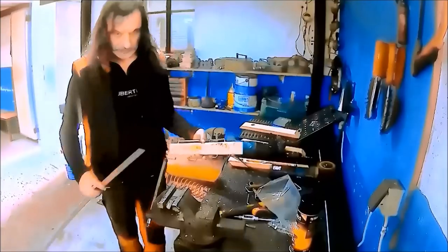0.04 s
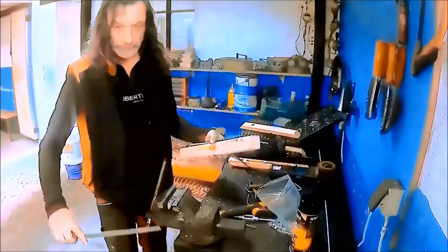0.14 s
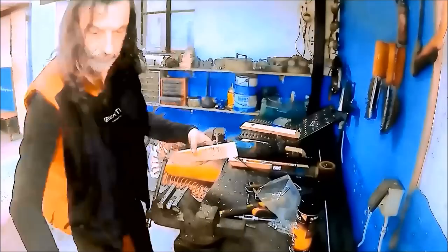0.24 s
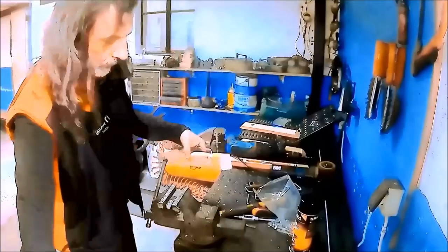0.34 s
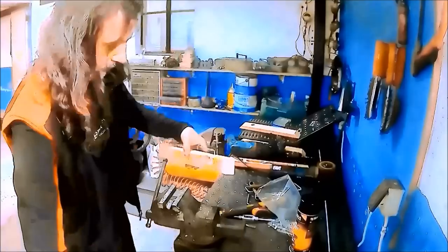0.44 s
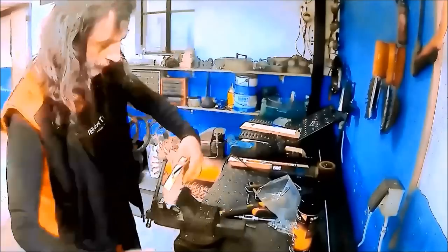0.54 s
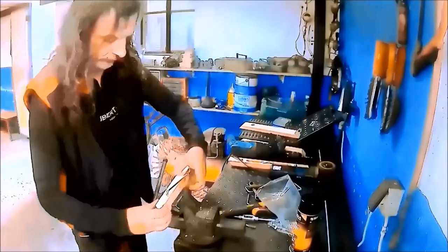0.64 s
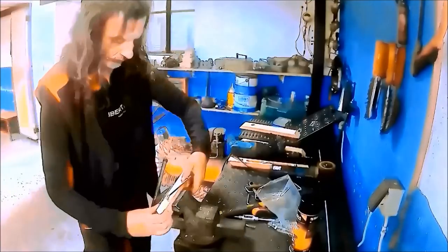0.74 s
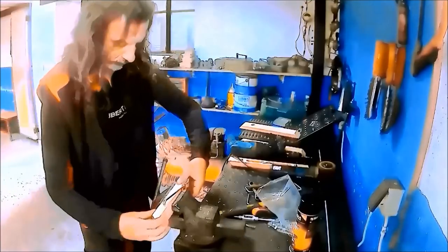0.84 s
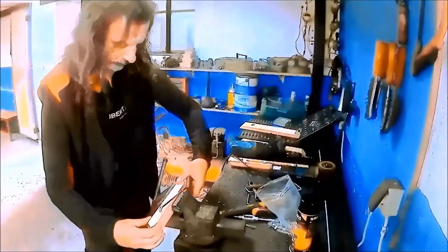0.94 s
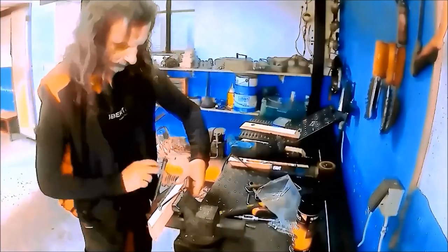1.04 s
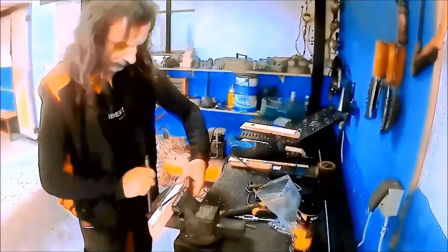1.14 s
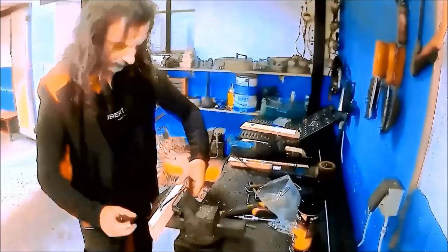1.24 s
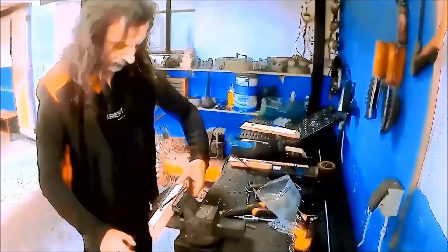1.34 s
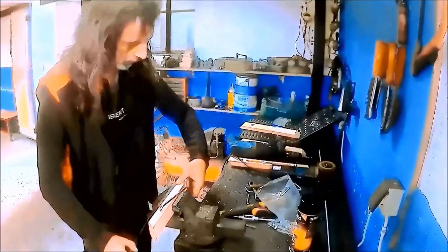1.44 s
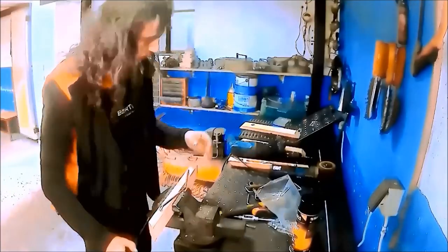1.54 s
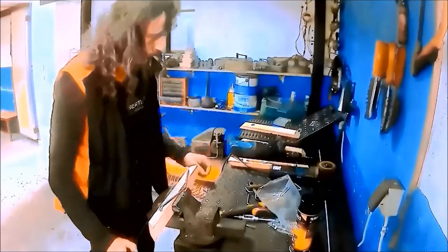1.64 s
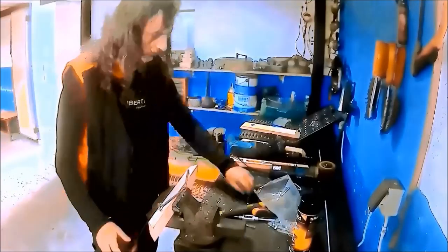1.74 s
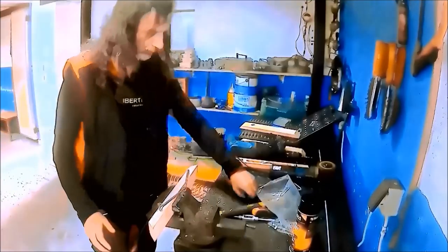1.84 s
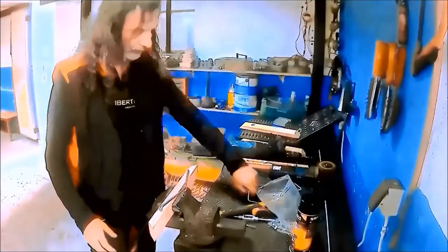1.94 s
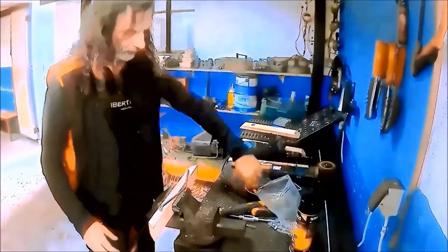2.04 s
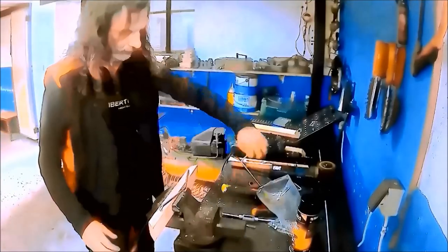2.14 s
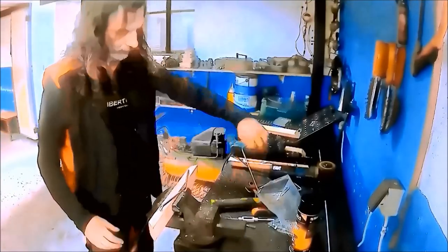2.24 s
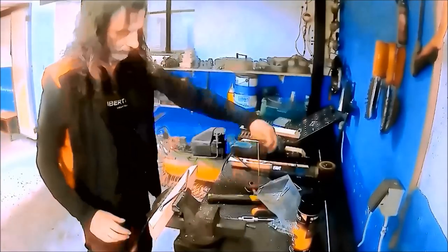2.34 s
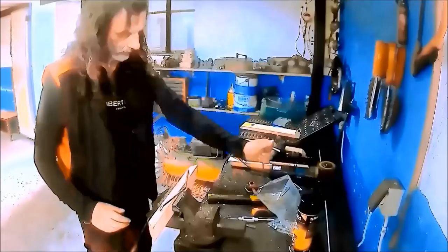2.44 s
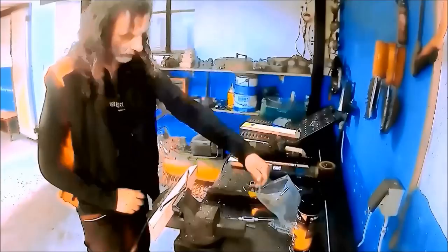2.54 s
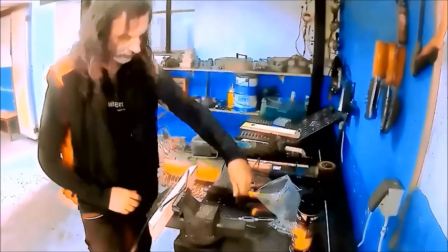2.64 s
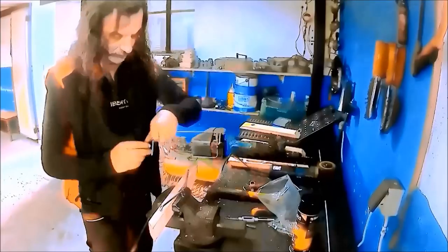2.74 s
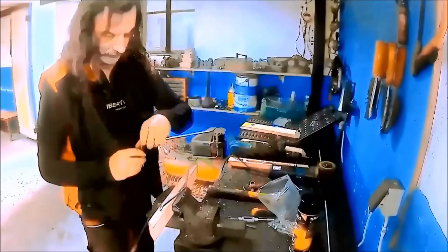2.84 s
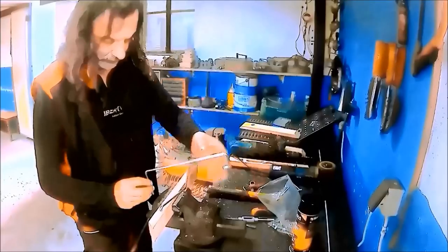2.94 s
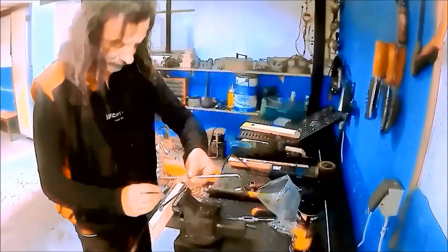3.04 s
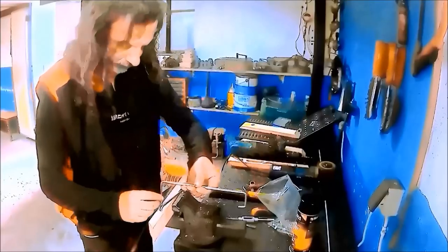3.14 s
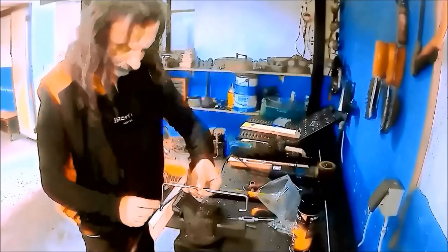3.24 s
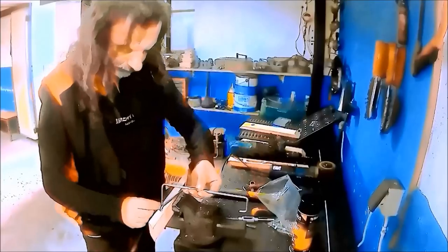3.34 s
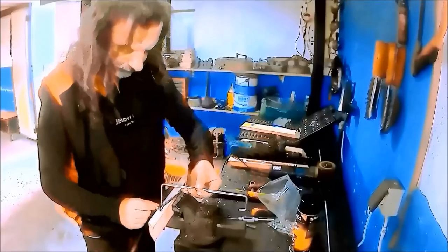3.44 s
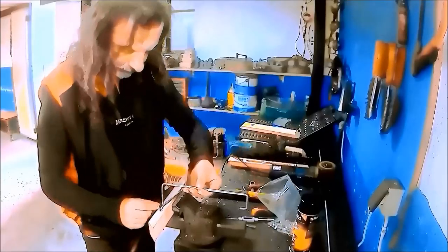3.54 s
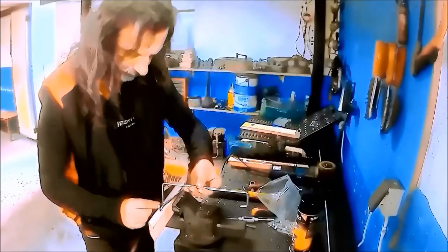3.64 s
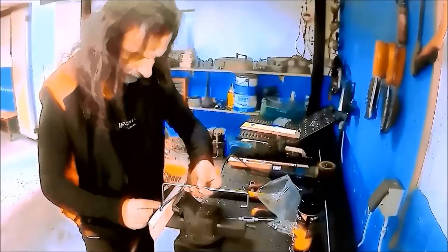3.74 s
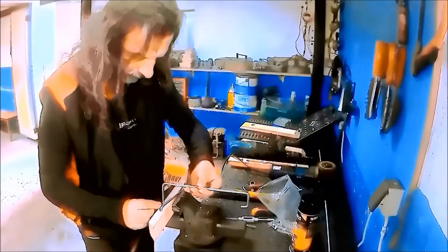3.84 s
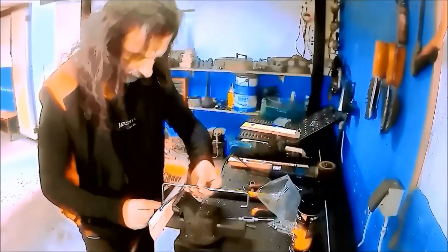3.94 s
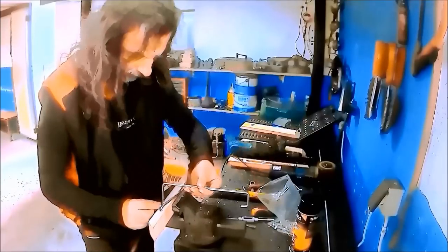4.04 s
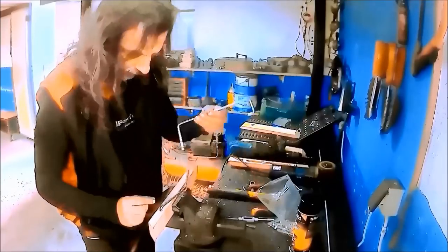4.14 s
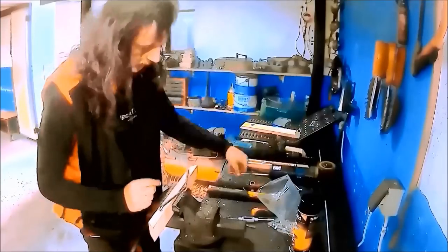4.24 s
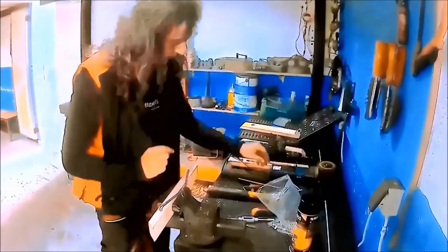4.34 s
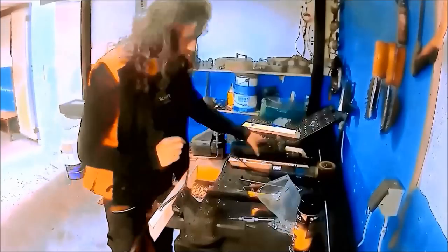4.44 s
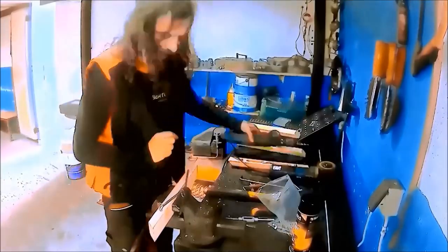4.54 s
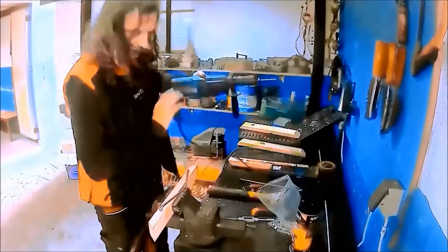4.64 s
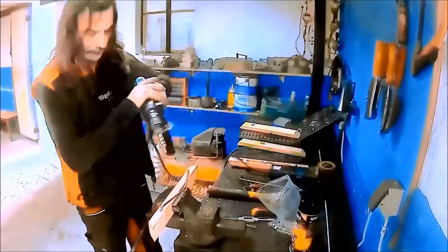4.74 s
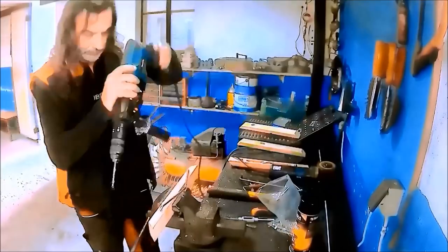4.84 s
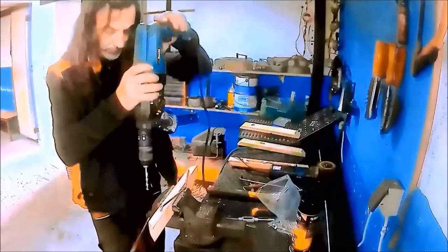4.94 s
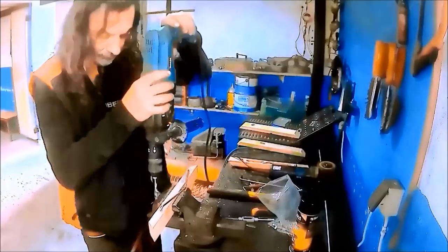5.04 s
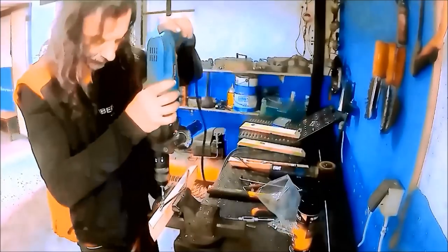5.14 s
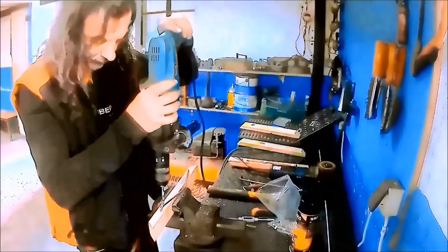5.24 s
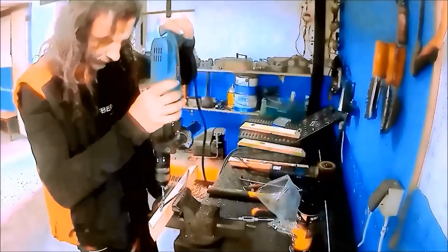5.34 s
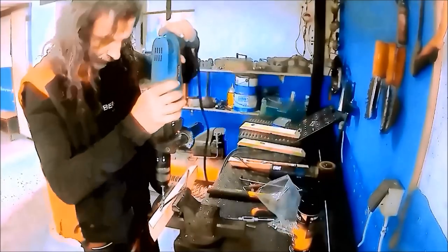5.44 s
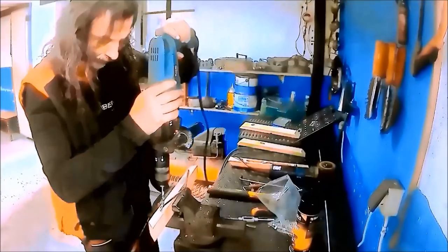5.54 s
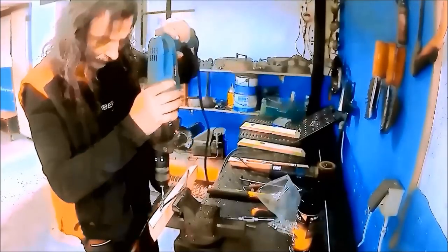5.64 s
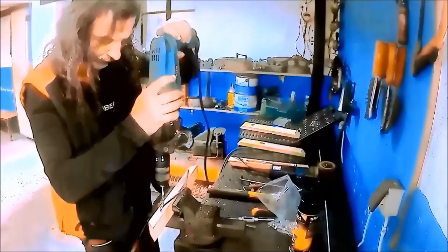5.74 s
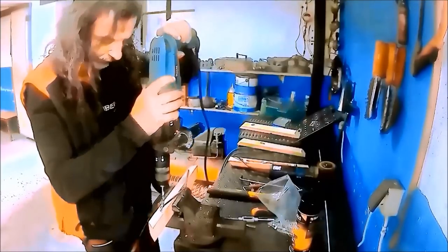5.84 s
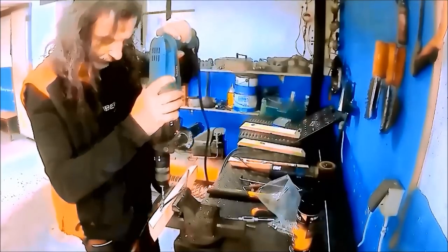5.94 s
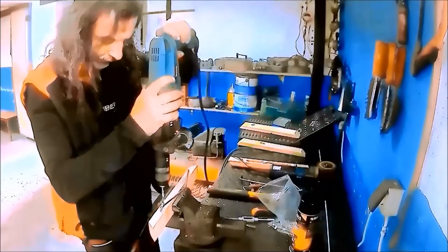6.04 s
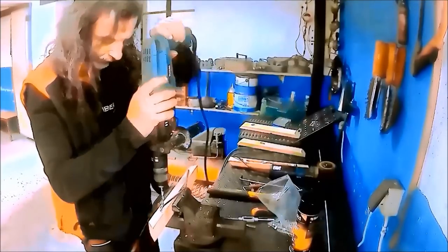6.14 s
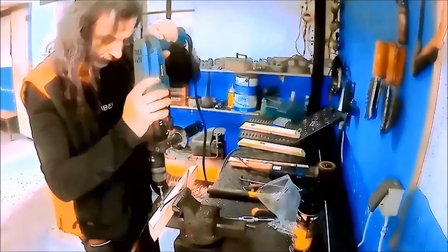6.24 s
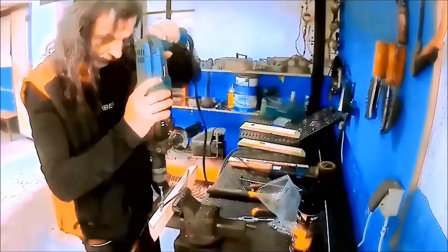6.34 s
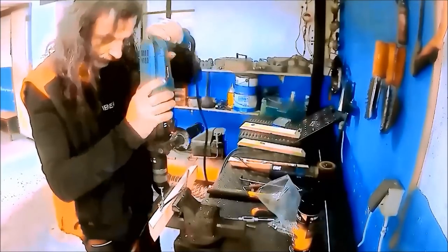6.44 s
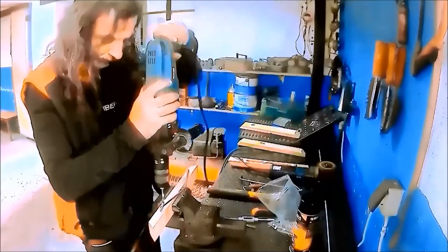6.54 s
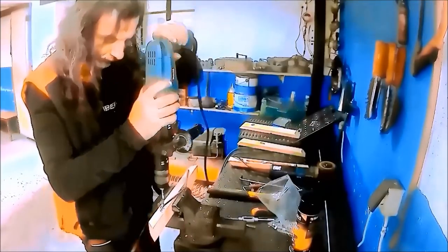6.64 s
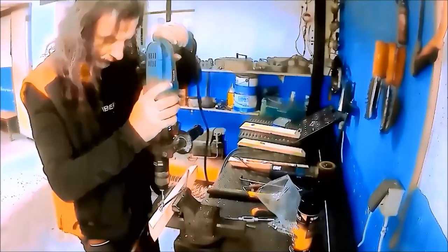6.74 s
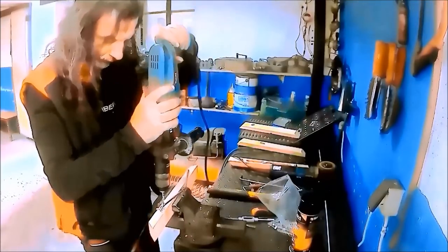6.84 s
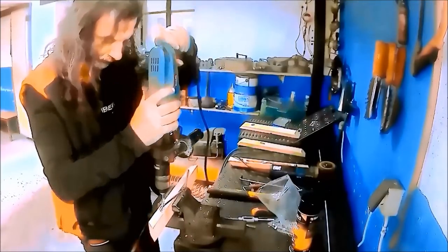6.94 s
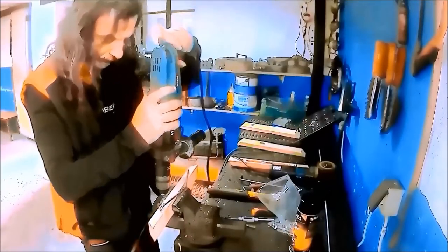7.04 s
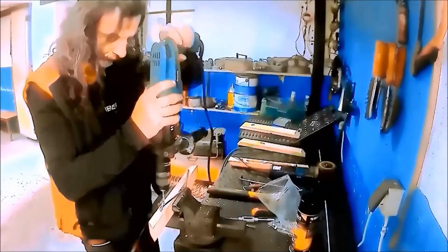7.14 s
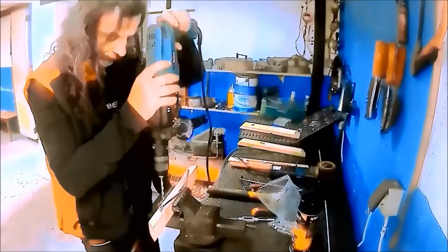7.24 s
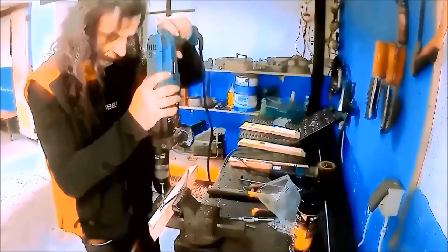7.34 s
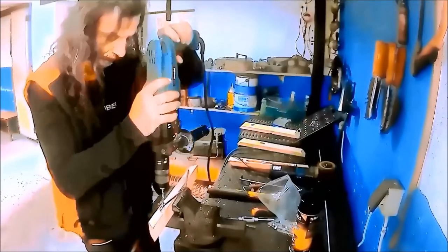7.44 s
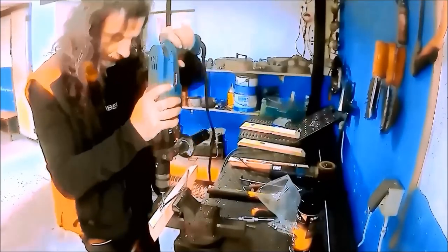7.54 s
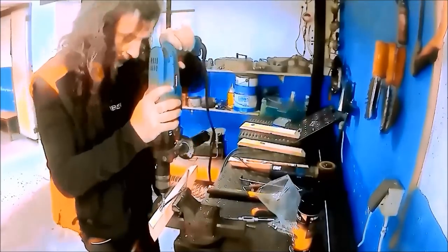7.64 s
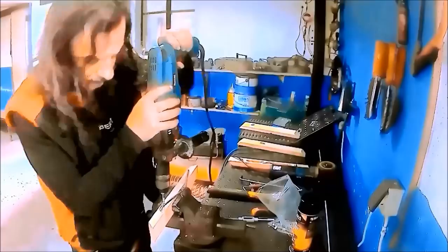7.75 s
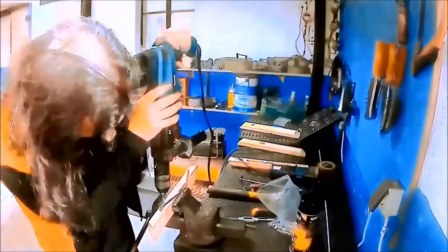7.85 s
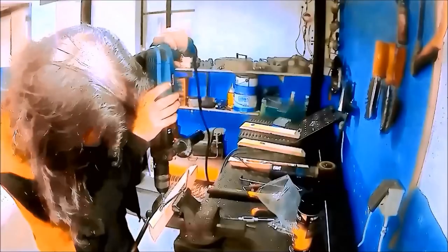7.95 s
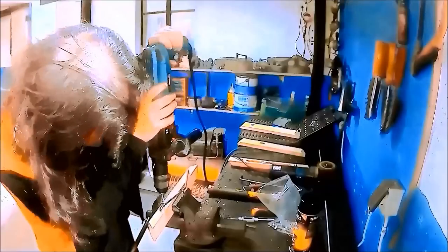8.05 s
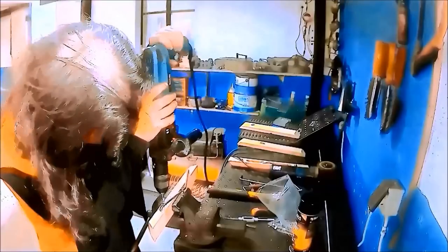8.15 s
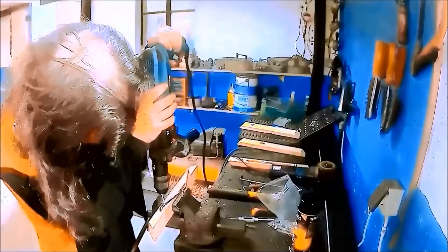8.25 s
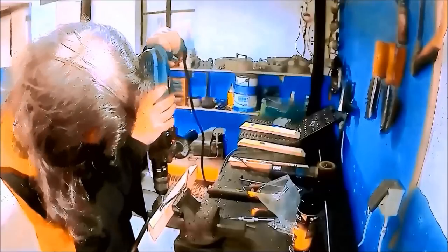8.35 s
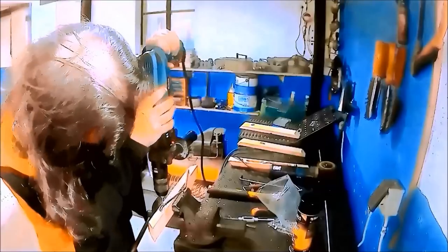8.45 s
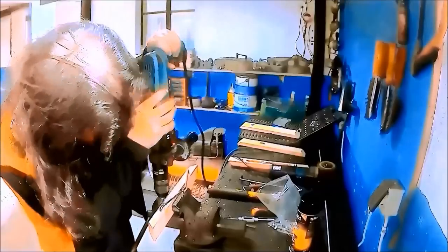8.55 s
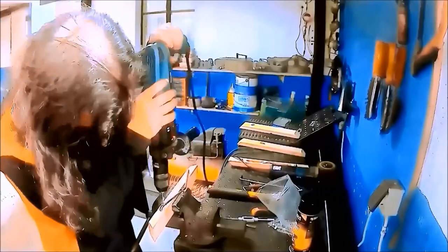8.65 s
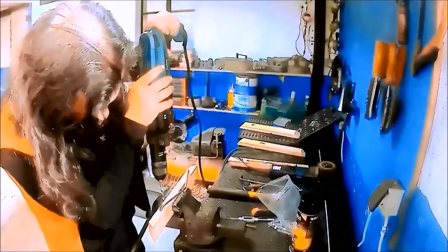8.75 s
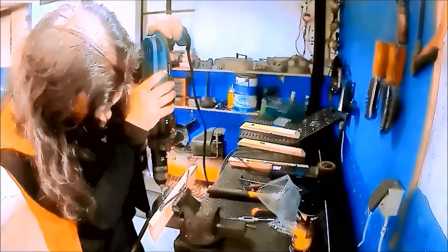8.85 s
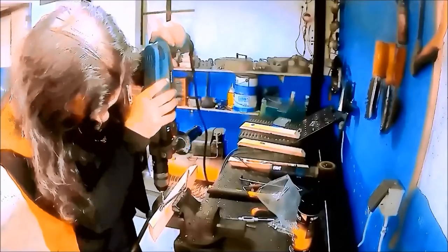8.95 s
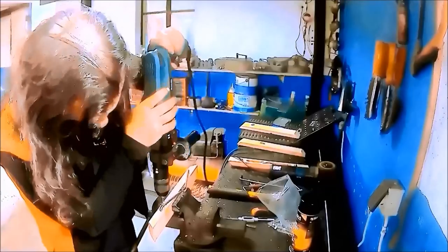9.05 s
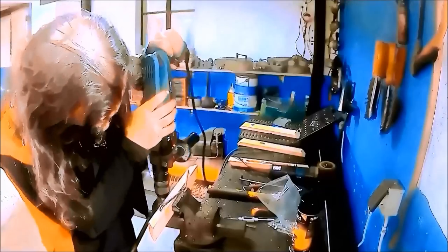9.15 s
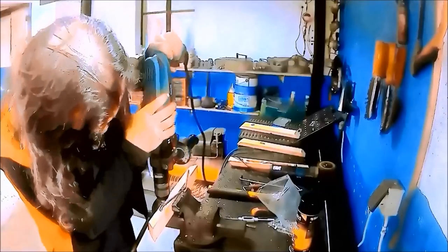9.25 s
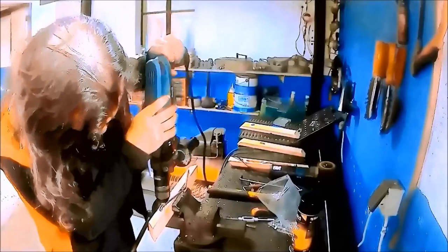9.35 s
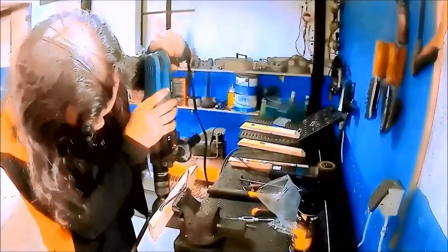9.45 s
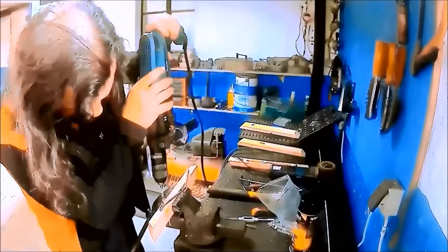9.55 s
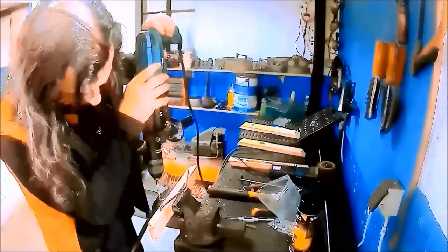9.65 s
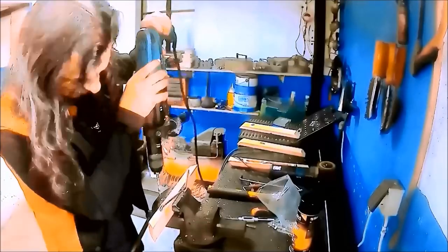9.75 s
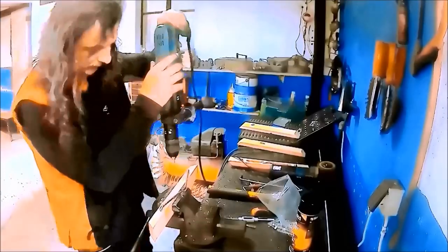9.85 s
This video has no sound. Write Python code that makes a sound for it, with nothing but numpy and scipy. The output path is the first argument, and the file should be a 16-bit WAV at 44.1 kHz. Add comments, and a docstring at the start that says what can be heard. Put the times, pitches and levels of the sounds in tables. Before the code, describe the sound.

A low, slightly wavering machine hum and soft air noise fill a small hard-walled workshop. Metal rubs briefly in a vise, then tools clatter on the bench, one clack quite loud. Later a handheld electric drill starts gently, revs up in short bursts, coasts down, then bites with a harsher, louder whine before running down. Close microphone, short room reverberation, dull above the upper treble.

```python
"""Drill bursts in a humming workshop

A machine hums steadily as wavering tones in resonant air noise. Metal slides in a bench vise (rubbed noise)
and tools land on the bench (noise cracks with steel modes). Then a handheld electric drill runs in bursts:
each squeeze pulls the rotor towards a new speed, each release lets it coast. Fan and gears whine at multiples
of its speed, brushes hiss and the bit scrapes, all louder the faster it turns.
"""
import sys
import numpy as np
from scipy import signal
from scipy.fft import rfft, irfft, next_fast_len
from scipy.io import wavfile
from scipy.ndimage import uniform_filter1d

SR = 44100
rng = np.random.default_rng(int(sys.argv[2]) if len(sys.argv) > 2 else 0)


def inscribe(sig):
    """Save sig as 16-bit PCM at rate SR to the path in sys.argv[1].

    A 1-D sig is mono; a 2-D sig holds one channel per row.
    Samples are clipped to [-1, 1] before scaling.
    """
    pcm = np.round(np.clip(np.atleast_2d(sig).T, -1, 1) * 32767)
    wavfile.write(sys.argv[1], SR, pcm.astype(np.int16))


N = 437031
TIME = np.arange(N) / SR
EDGE_HZ = 15750

# trigger pressures: start_s, target_turns_per_s, rotor_lag_s, level_db (at working speed), treble_share_db,
# whine_to_hiss_db, load (0 turning gently, 1 revving, 2 biting)
SQUEEZES = [ (6.165, 224.8, 0.12, -24, -6.5, 1, 0.2), (6.5, 187.1, 0.21, -25.5, -8, 2, 0.49),
            (6.6, 186, .2, -22, -5.5, 4.5, 0.13), (6.921, 448.8, 0.054, -20.5, -5, 2.5, 1.16),
            (7.335, 558, 0.049, -19, -7.5, -3.5, 1.3), (8.404, 245, 0.11, -22, -9.5, 3, 0.0039),
            (8.547, 346, 0.056, -20.5, -6, 2.5, 1.2), (8.809, 481.6, .076, -24, -8, -2, 1),
            (9.31, 420, .08, -15.5, -5, 3, 1.9), (9.425, 390, .3, -16.5, -6, 1, 1.95),
            (9.64, 388, 0.32, -19, -7, -6, 1.8), ]
# trigger let go: start_s, level_db (at working speed), treble_share_db, whine_to_hiss_db
RELEASES = [(7.22, -20.5, -6, 2.5), (7.413, -22, -8.5, -5), (8.954, -27.5, -8.5, -1.5),
            (9.798, -20, -7.5, -14)]
# fan blades (multiples of 5), gear teeth (multiples of 13) and neighbours:
# order (multiple of rotor speed), gentle_db, revving_db, biting_db (relative)
WHINE_ORDERS = [(5, -11, -16, 0.5), (8, -13, -12.5, -8), (10, 2, -2.5, -9), (13, -2, 5, -10),
                (15, -3.5, 1.5, -14), (18, -15, -23, -10), (20, -8, 1.5, 7), (25, -2, 1, -12),
                (26, 6.5, -6.5, 0), (30, -8, -3.5, 6), (31, -17, -4, -17), (39, -5, -13, -14),
                (40, -6, -3, -1), (45, -2, -16, -15), (50, -3, -11, -5), (54, -2, -18, -16), (60, -5, 1, 0)]
# colour of the drill's housing: freq_hz, density_db (relative)
HOUSING = [(530, -48), (900, -22.5), (1320, -21), (1760, -13.5), (2080, -10.5), (3410, -4.5), (3890, -6),
           (5060, -1.5), (6990, -3), (8070, -9.5), (8680, -4), (12400, -4), (13500, -4.5), (14900, -4),
           (15800, -27)]
# ringing of chuck and bit: freq_hz, width_hz, above_housing_db
CHUCK_MODES = [(1670, 160, 3.5), (2385, 100, 5), (3460, 44, 9), (4705, 46, 7), (6220, 500, 3),
               (7140, 500, 1.5), (9900, 110, 7), (11740, 300, 2)]
# colour of the shaking bench: freq_hz, density_db (relative)
RUMBLE = [(20, -5), (120, -8), (280, 2), (700, -8), (1200, -23), (2500, -44)]
# tools and parts set down: start_s, level_db, body_db, brightness_db, t60_s
KNOCKS = [(0.59, -32.5, -14, 7, 0.037), (0.654, -31.5, -9, 4, 0.084), (0.669, -34, 0, 3, .05),
          (2.169, -37.5, -1, 9, 0.17), (2.22, -31, -6, 5, 0.071), (2.287, -36, -1, 4, 0.13),
          (2.346, -30, 3.5, 0, 0.18), (2.41, -30, -8, 0, 0.097), (2.433, -12, -9, -11, 0.042),
          (2.438, -12.5, -0.5, 2.5, 0.056), (2.6, -36, 6, -2, 0.12), (2.717, -23.5, -6, 8, 0.057),
          (4.583, -20.5, 1.5, 0, 0.11), (4.594, -26, -19, 6, .06), (4.608, -24.5, -15, 7, 0.087),
          (5.242, -38, -3, 0, 0.072), (5.419, -43, -6, 14, 0.034), (7.436, -26, -1, -2, 0.085),
          (8.0, -37, 3, 0, 0.086)]
# colour of a blow on the bench: freq_hz, density_db (relative)
BENCH = [(240, -42), (400, -4), (1310, -2.5), (1430, 1.5), (2110, -8), (3610, -5.5), (3960, -11),
         (5810, -5), (7790, -13), (14900, -23.5), (15800, -34)]
# modes of bench and steel: freq_hz, level_db (relative), t60_s (0.4 at most in use)
STEEL_MODES = [(796, 1, 0.49), (1050, 4, 0.25), (1384, 1, 0.24), (1870, 7, 0.17), (2256, 8, 0.17),
               (2420, -15, 0.24), (3520, -4, 0.34), (3680, -18, 0.34), (5600, -9, 0.13), (5940, -18, 0.36),
               (6395, -25, 0.45), (6869, -4, 0.4)]
# a strip catching and slipping between the vise jaws: start_s, level_db, hold_s
SLIPS = [(0.716, -42, .003), (0.735, -27, .008), (0.758, -31, .004), (0.772, -30, 0.027)]
# colour of metal sliding in the vise: freq_hz, density_db (relative)
SLIDE_COLOUR = [(1180, -23), (2000, -13), (2680, -17), (3700, -3.5), (4920, -9), (6210, -1), (9650, -14),
                (11100, -4.5), (14600, -11), (15800, -10)]
# steady tones of the machine: freq_hz, level_db
HUM_TONES = [(84.9, -60), (169.4, -59), (195.0, -39.3), (200.1, -48), (254.1, -61), (338.7, -50),
             (400.1, -34.7), (423.5, -55), (533.6, -62), (569, -60), (592.6, -60), (677.6, -57), (780, -58),
             (931, -67), (974, -68), (1559.5, -58), (1599, -62), (1695, -59), (1754, -59), (2799, -60),
             (3201, -57), (4677, -65), (6815, -68), (7195, -65)]
# the machine's fuzzy air resonances: freq_hz, width_hz, level_db
WHIR = [(200.5, 11, -52), (337.7, 14, -51), (381, 13.3, -46.5), (409, 9.7, -52.5), (681, 15, -63.5),
        (796, 41, -60), (1228, 22, -65), (1705, 39, -61), (2563, 61, -60.5), (2864, 36, -55.5),
        (3242, 33, -57.5)]
# the room's air noise: freq_hz, density_db (per Hz)
AIR = [(25, -90), (60, -85.5), (90, -85), (125, -81), (165, -75.5), (300, -75), (480, -78.5), (900, -85.5),
       (1400, -84.5), (1800, -82.5), (2200, -85.5), (4200, -83.5), (6500, -88), (7800, -93), (10800, -92),
       (11600, -101), (14500, -104), (15600, -112)]
# reverberation of the workshop: freq_hz, t60_s
ROOM = [(300, 0.65), (1500, 0.27), (6000, 0.31), (15000, 0.21)]

COAST_LAG_S, FRICTION_TURNS_PER_S2 = .448, 458  # air drag; even braking by friction
WORKING_TURNS_PER_S, CREEP_TURNS_PER_S = 400, 25  # silent below creep
LOUDNESS_POWER = 0.81  # of the speed above creep
SETTLE_LAG_S = 0.027  # level and tone after a change of grip
SLIP_ATTACK_S, SLIP_FADE_DB_PER_S = .002, 300


def amp(db):
    """Decibels to gain."""
    return 10 ** (np.asarray(db) / 20)


def unit(x):
    """Scales to rms 1."""
    return x / np.sqrt(np.mean(x ** 2) + 1e-20)


def read(points, hz):
    """Reads a spectrum table on a log-frequency axis."""
    f, value = np.transpose(points)
    return np.interp(np.log(hz + 1), np.log(f + 1), value)


def bell(f, hz, width_hz):
    """Resonance hump of height 1."""
    return np.exp(-2 * ((f - hz) / width_hz) ** 2)


def colour(x, gain):
    """Filters x by gain, a function of frequency."""
    size = next_fast_len(len(x))
    return irfft(rfft(x, size) * gain(np.fft.rfftfreq(size, 1 / SR)), size)[:len(x)]


def drift(t, rate):
    """Smooth chance of rms 1, changing about rate times per unit of t."""
    knots = rng.standard_normal(8192)
    return unit(np.interp((t - t[0]) * rate, np.arange(len(knots)), knots))


def sine(turns):
    """Sine of a phase given in turns."""
    return np.sin((2 * np.pi * (turns - np.floor(turns))).astype(np.float32))


def approach(start, goal, lag_s, t):
    """Exponential move from start towards goal."""
    return goal + (start - goal) * np.exp(-t / lag_s)


def add(mix, start_s, sound):
    """Mixes a sound in at start_s."""
    part = mix[max(round(start_s * SR), 0):][:len(sound)]
    part += sound[:len(part)]


def drill(jitter=0.002015, slack=.6, whine_knee_turns_per_s=150, cut_db=-4, judder_db=0.3, rumble_db=-30):
    """The running motor: whine, hiss and screech, weighted by speed and load, over a faint bench rumble."""
    t = TIME[TIME >= SQUEEZES[0][0]]
    speed, level_db, treble_db, whine_db, load = trigger(t)
    audible = np.maximum(speed - CREEP_TURNS_PER_S, 0) / (WORKING_TURNS_PER_S - CREEP_TURNS_PER_S)
    level = amp(level_db) * audible ** LOUDNESS_POWER

    # the gears run less evenly while the speed changes
    surge = abs(np.gradient(speed, t)) / WORKING_TURNS_PER_S
    rotor = speed * (1 + jitter * (1 + slack * surge) * drift(t, 120))
    turns = np.cumsum(rotor) / SR

    # a slow rotor hardly whines; the bit screeches only once it bites
    whine_gain = amp(whine_db) * speed ** 2 / (speed ** 2 + whine_knee_turns_per_s ** 2)
    bite = amp(cut_db) * np.clip(load - 1, 0, 1)
    sound = hiss(t, rotor, turns) + bite * screech(t) + whine_gain * whine(t, rotor, turns, load)
    sound = sound / np.sqrt(1 + bite ** 2 + whine_gain ** 2)
    sound = sound * amp(judder_db * drift(t, 140))

    # rebalance the treble to its share
    top = colour(sound, lambda f: np.clip((f - 8000) / 1500, 0, 1))
    rest_gain = np.sqrt(np.clip(1 - amp(treble_db) ** 2, .1, 1))
    sound = unit(sound - top) * rest_gain + unit(top) * amp(treble_db)
    return t[0], level * (sound + amp(rumble_db) * rumble(t))


def trigger(t):
    """Speed, level, treble, whine and load, pulled exponentially to new goals by each squeeze or release."""
    # coasting aims below zero speed, so friction stops the rotor
    coasts = [(s, -FRICTION_TURNS_PER_S2 * COAST_LAG_S, COAST_LAG_S, *tone) for s, *tone in RELEASES]
    state = np.outer([0, *SQUEEZES[0][3:]], np.ones(len(t)))
    for start_s, speed, lag_s, *tone in sorted(SQUEEZES + coasts):
        at = np.searchsorted(t, start_s)
        since = t[at:] - start_s
        state[:, at:] = state[:, [at]]
        state[0, at:] = np.maximum(approach(state[0, at], speed, lag_s, since), 0)
        for k, goal in enumerate(tone, 1):
            state[k, at:] = approach(state[k, at], goal, SETTLE_LAG_S, since)
    return state


def whine(t, rotor, turns, load, flutter=.33, ripple_db=3.0, ripple_hz=90):
    """Fan and gear tones at rotor orders; gliding, they flare and fade unevenly as they sweep through the
    room's response."""
    tones = np.zeros(len(t))
    for order, *load_db in WHINE_ORDERS:
        # load shifts the balance; bearing play makes each order flutter by itself
        size = np.interp(load, np.arange(len(load_db)), amp(load_db)) * (1 + flutter * drift(t, 110))
        in_band = round(order) * rotor < EDGE_HZ
        tones += size * in_band * sine(round(order) * turns + rng.random())

    def shell(f):
        return housing(f) * np.clip((f - 1000) / 700, 0, 1) * amp(ripple_db * drift(f, 1 / ripple_hz))
    tones = colour(tones, shell)
    power = abs(uniform_filter1d(tones ** 2, size=4000))
    return tones / np.sqrt(power + 1e-9)


def hiss(t, rotor, turns, chop=0.27, grit_db=-7, grit_per_turn=8):
    """Brush noise surging twice a turn, with sharp grains from teeth and cutting edges."""
    brushes = rng.standard_normal(len(t)) * (1 + chop * sine(2 * turns))
    grains = rng.standard_normal(len(t)) * (rng.random(len(t)) < grit_per_turn * rotor / SR)
    return unit(colour(unit(brushes) + amp(grit_db) * unit(grains), housing))


def screech(t, cut_hz=6500, cut_width_hz=1900, chip_db=-3, chips_per_s=120, chip_s=.0012):
    """Cutting noise in a band, with short decaying bursts as chips snap off the edges."""
    noise = rng.standard_normal(len(t))
    cut = unit(colour(noise, lambda f: housing(f) * bell(f, cut_hz, cut_width_hz)))
    starts = 1. * (rng.random(len(t)) < chips_per_s / SR)
    snaps = signal.lfilter([1], [1, -np.exp(-1 / (chip_s * SR))], starts)
    chips = unit(colour(snaps * rng.standard_normal(len(t)), housing))
    return unit(cut + amp(chip_db) * chips)


def rumble(t):
    """Low noise of the bench shaking under the vise."""
    return unit(colour(rng.standard_normal(len(t)), lambda f: amp(read(RUMBLE, f))))


def housing(f):
    """Gain of the drill's shell with the resonances of chuck and bit."""
    modes_db = sum(db * bell(f, hz, width_hz) for hz, width_hz, db in CHUCK_MODES)
    return amp(read(HOUSING, f) + modes_db)


def knock(start_s, level_db, body_db, bright_db, t60_s, ring_db=-11, rise_s=0.00025, rattle_db=2.0):
    """A blow: dense, quickly dying vibration plus a few steel modes with their own decays."""
    t = np.arange(SR // 4) / SR
    shade = [(1500, body_db), (4000, 0), (7500, 0), (12000, bright_db)]
    # the part chatters as it settles
    chatter = rng.standard_normal(len(t)) * amp(rattle_db * drift(t, 600))
    crack = unit(colour(chatter, lambda f: amp(read(BENCH, f) + read(shade, f))))
    ring = np.zeros(len(t))
    for hz, db, mode_t60_s in STEEL_MODES:
        mode_db = db + read(shade, hz) - 60 * t / min(mode_t60_s, .4)
        ring += amp(mode_db) * sine(hz * t + rng.random())
    ring /= np.linalg.norm([amp(db) for _, db, _ in STEEL_MODES])
    blow = crack * amp(-60 * t / max(t60_s, .005)) + amp(ring_db) * ring
    return start_s, amp(level_db) * blow * (1 - np.exp(-t / rise_s))


def slip(start_s, level_db, hold_s, catch_db=1.0, catches_per_s=700):
    """Metal rubbing on metal: unevenly catching noise, sharp start, even decay in dB."""
    t = np.arange(SR // 4) / SR
    rub = rng.standard_normal(len(t)) * amp(catch_db * drift(t, catches_per_s))
    rub = unit(colour(rub, lambda f: amp(read(SLIDE_COLOUR, f))))
    fade_db = SLIP_FADE_DB_PER_S * np.maximum(t - hold_s, 0)
    envelope = np.minimum(t / SLIP_ATTACK_S, 1) * amp(level_db - fade_db)
    return start_s, envelope * rub


def hum(waver_hz_at_400_hz=.12, flutter=0.04):
    """Steady machine tones on one wavering clock, so higher ones waver by more hertz."""
    clock = TIME + np.cumsum(drift(TIME, 9)) / SR * waver_hz_at_400_hz / 400
    tones = sum(amp(db) * sine(hz * clock + rng.random()) for hz, db in HUM_TONES)
    return np.sqrt(2) * tones * (1 + flutter * drift(TIME, 12))


def air(ripple_db=2.5, ripple_hz=35):
    """Broad air noise rippled by room modes, plus the machine's fuzzy resonances."""
    def density(f):
        broad = amp(read(AIR, f) + ripple_db * drift(f, 1 / ripple_hz)) ** 2
        whir = sum(amp(db) ** 2 * bell(f, hz, width_hz) / width_hz for hz, width_hz, db in WHIR)
        return np.sqrt(broad + whir)
    return colour(rng.standard_normal(N), density) * np.sqrt(SR / 2)


def room(x, first_s=.004, taps_per_s=3000):
    """Sparse reflections off near walls and shelves; the lows die last."""
    t = np.arange(SR // 2) / SR
    hits = (rng.random(len(t)) < taps_per_s / SR) * (t > first_s)
    taps = rng.choice([-1., 1.], len(t)) * hits
    hz, s, z = signal.stft(taps, SR, nperseg=256)
    decay = amp(-60 * s / read(ROOM, hz)[:, None])
    tail = signal.istft(z * decay, SR, nperseg=256)[1]
    return signal.fftconvolve(x, tail / np.linalg.norm(tail))[:N]


def scene(drill_room_db=-10, bench_room_db=-8, drill_db=-0.26):
    """Drill and bench sounds in the humming room, the same in both channels."""
    motor, bench = np.zeros(N), np.zeros(N)
    add(motor, *drill())
    for row in KNOCKS:
        add(bench, *knock(*row))
    for row in SLIPS:
        add(bench, *slip(*row))
    motor = amp(drill_db) * motor
    reverb = room(amp(drill_room_db) * motor + amp(bench_room_db) * bench)
    mono = motor + bench + reverb + hum() + air()
    return np.array([mono, mono])


def record(dry):
    """Steep low-pass at EDGE_HZ: nothing is heard above it."""
    taps = signal.firwin(511, EDGE_HZ, window=("kaiser", 9), fs=SR)
    return signal.oaconvolve(dry, taps[None], "same")


dry = scene()
out = record(dry)
inscribe(out)
```